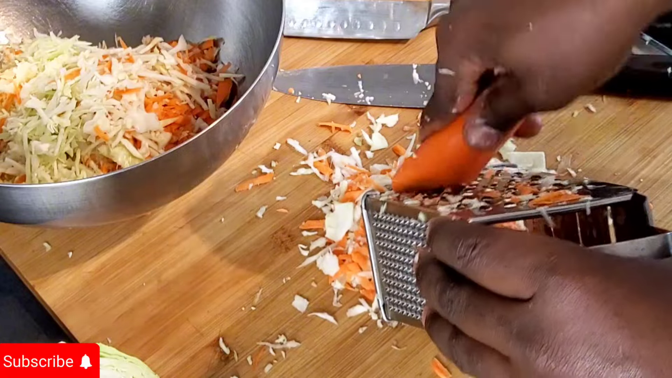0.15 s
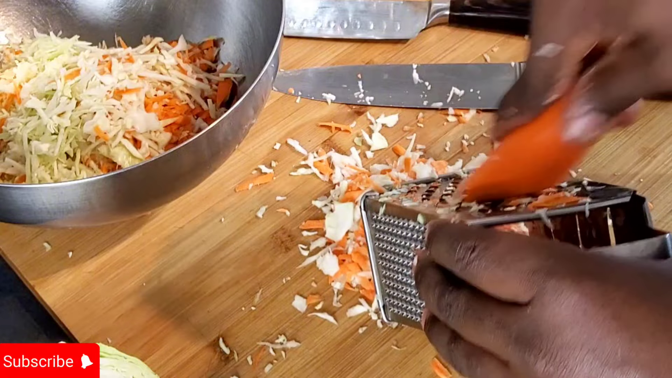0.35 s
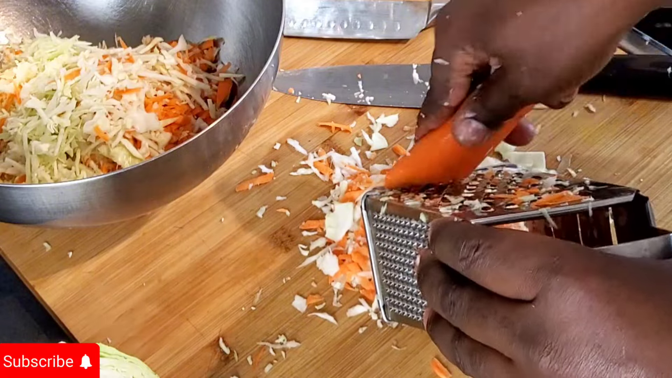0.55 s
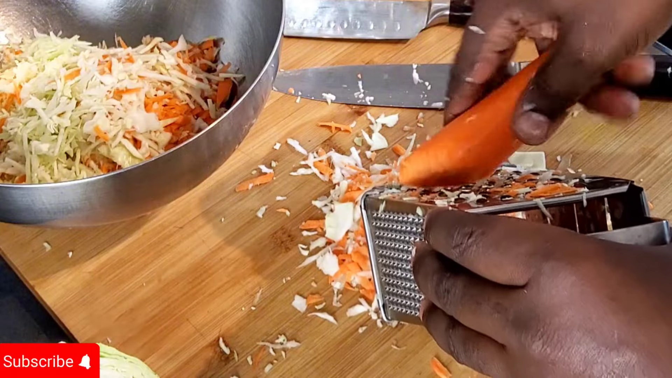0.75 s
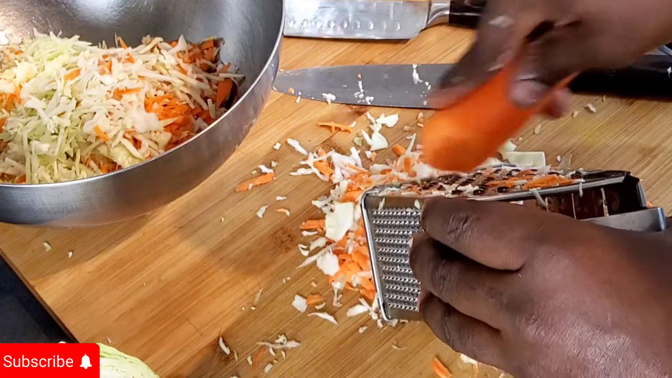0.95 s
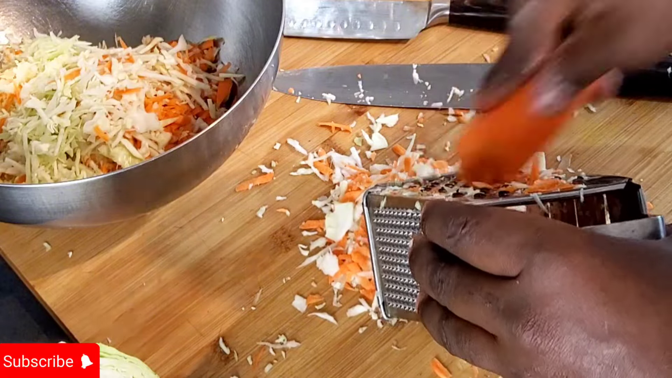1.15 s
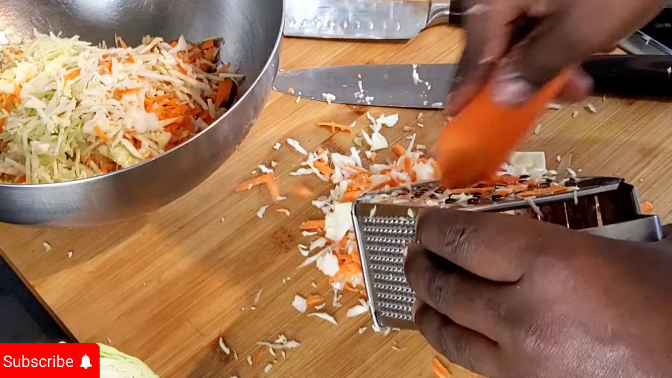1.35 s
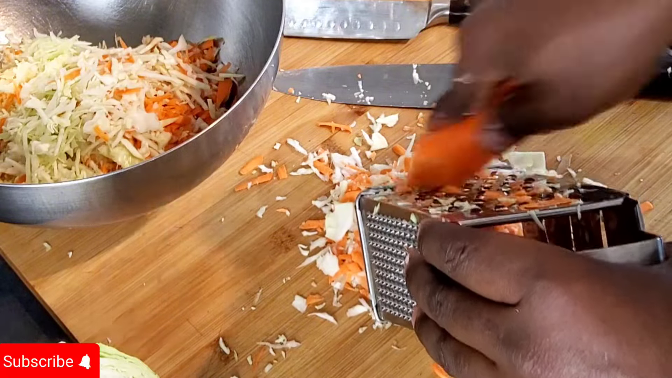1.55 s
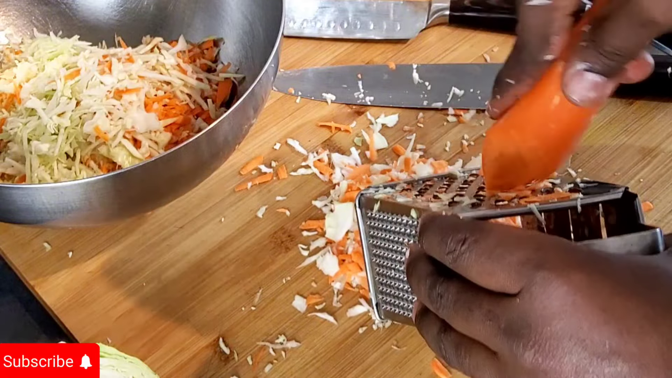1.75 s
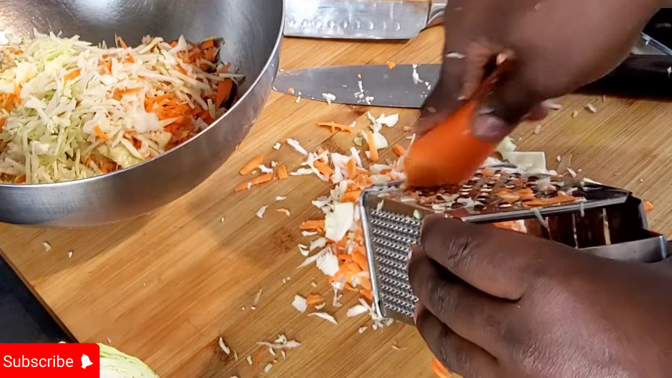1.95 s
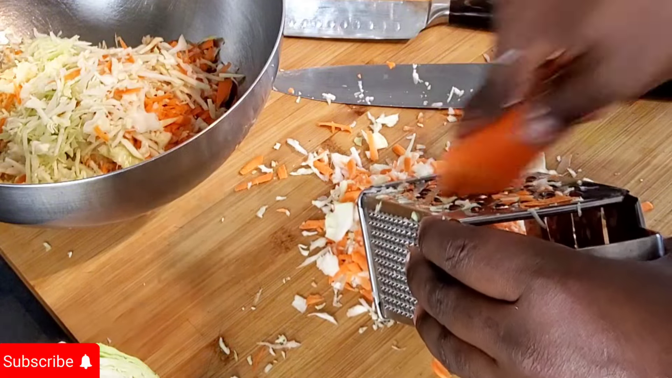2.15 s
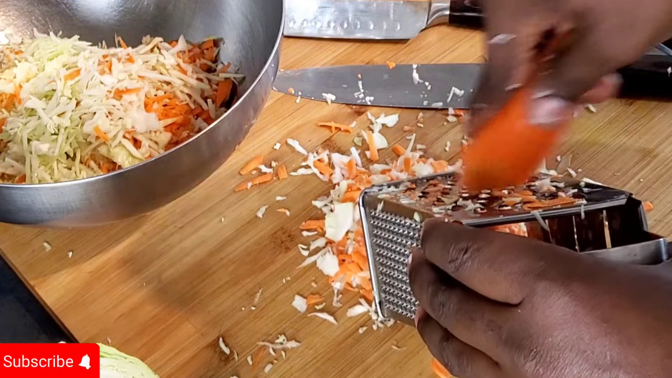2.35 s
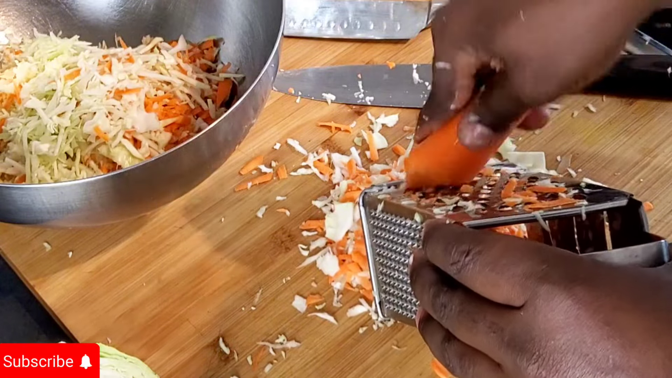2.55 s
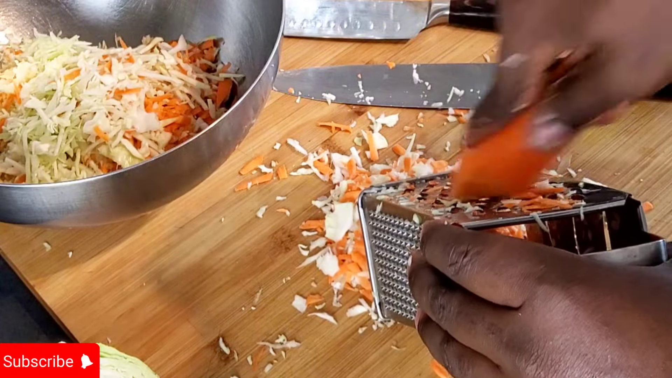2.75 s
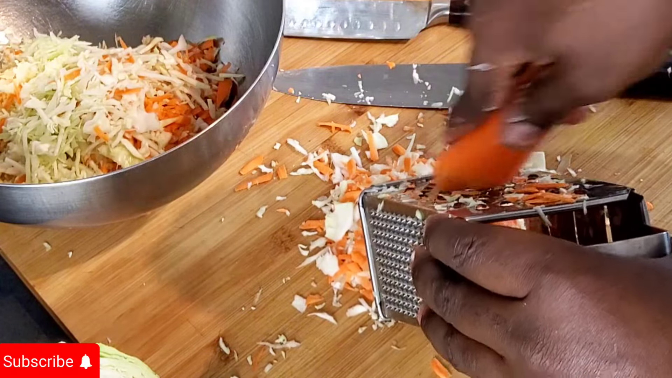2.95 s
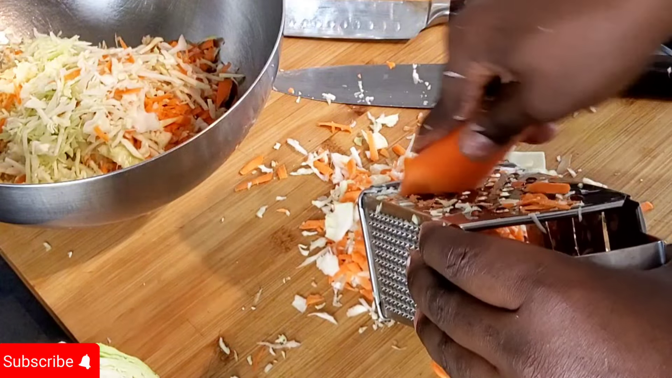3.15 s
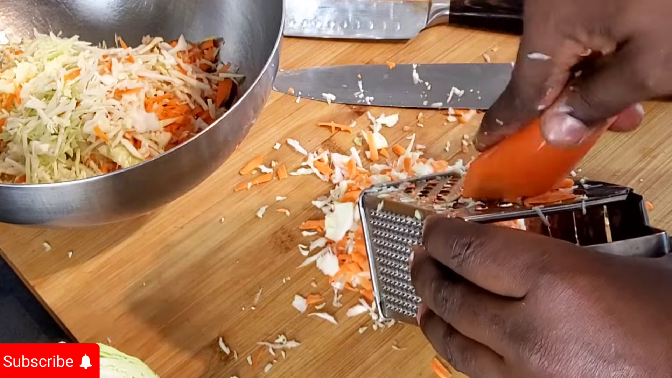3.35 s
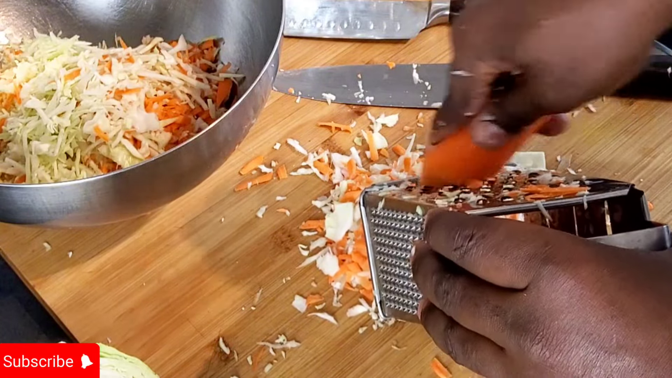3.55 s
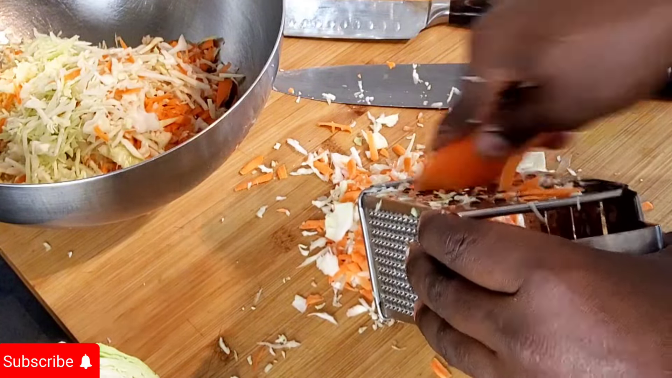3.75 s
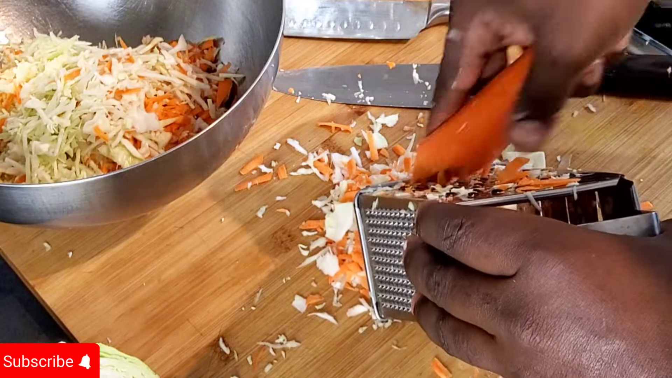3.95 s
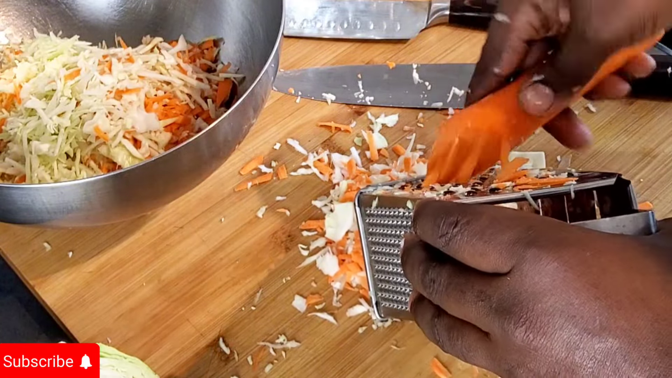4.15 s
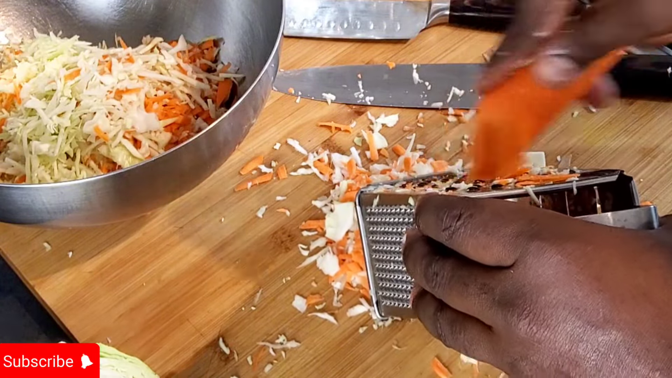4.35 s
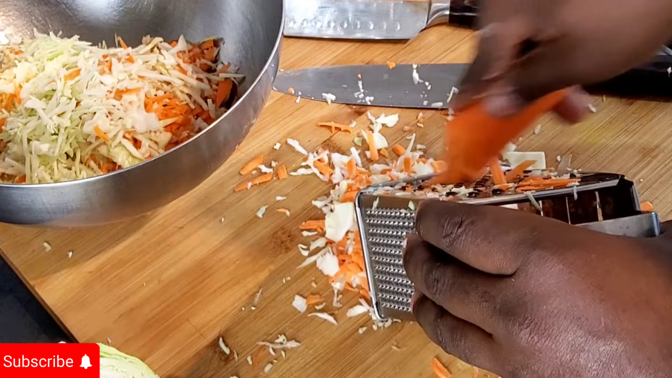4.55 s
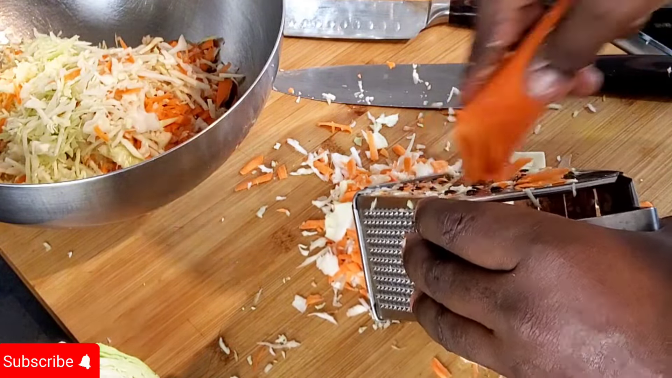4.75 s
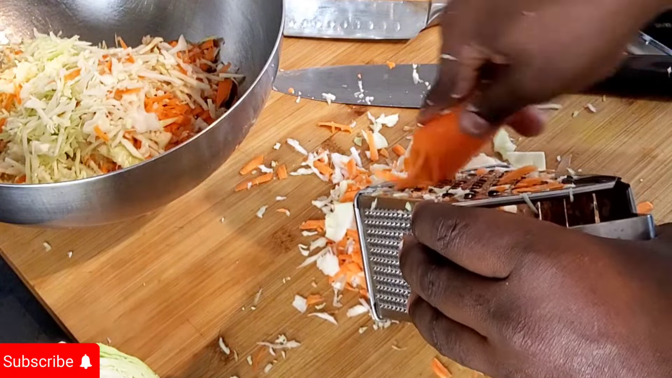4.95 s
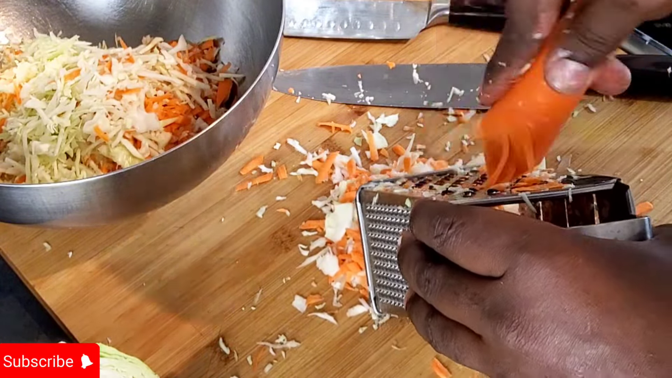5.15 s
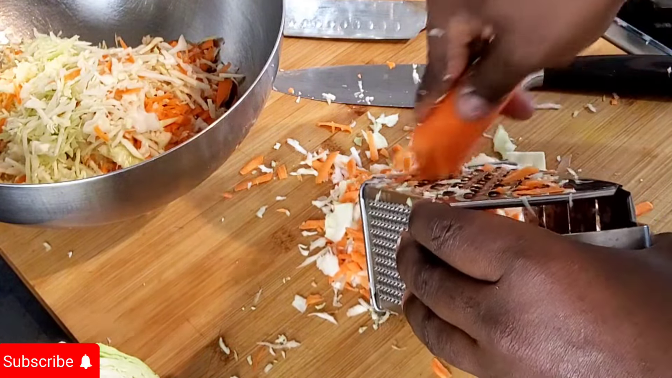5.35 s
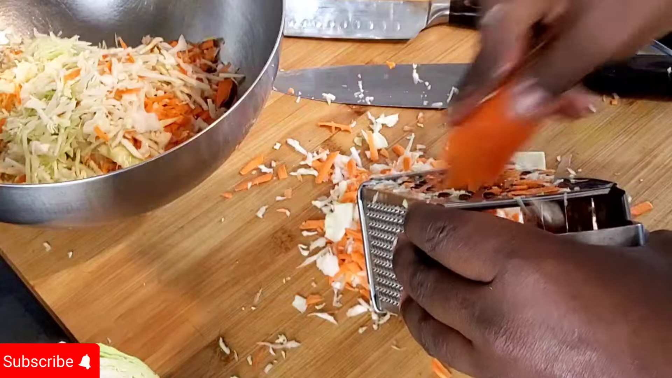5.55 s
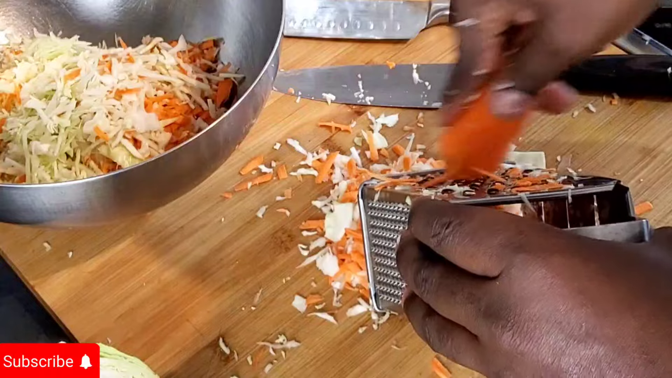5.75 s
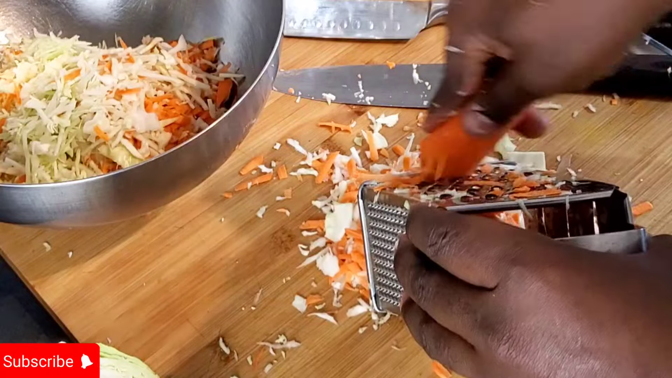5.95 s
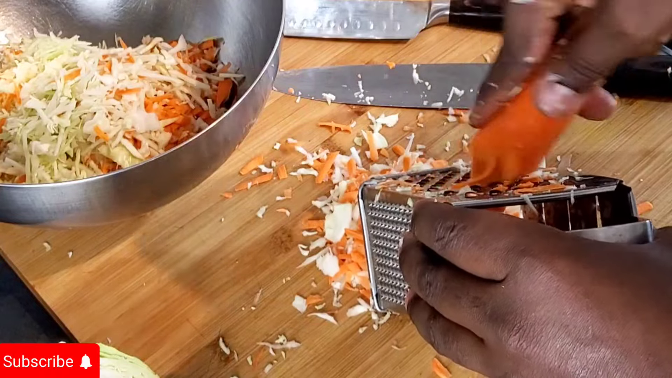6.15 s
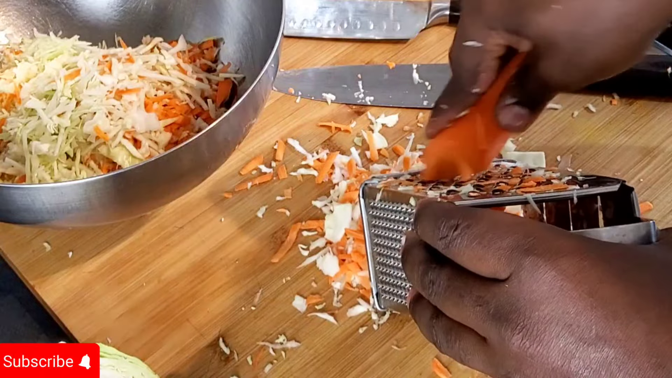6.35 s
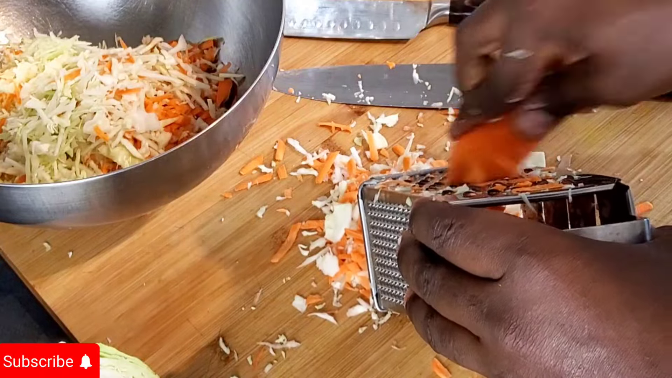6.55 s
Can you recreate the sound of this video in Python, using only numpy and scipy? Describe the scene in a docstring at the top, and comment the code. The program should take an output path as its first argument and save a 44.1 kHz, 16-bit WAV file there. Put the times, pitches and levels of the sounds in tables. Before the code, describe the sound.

A carrot is grated on a steel box grater in a quiet kitchen, close to the microphone. Each stroke is a crisp, crunchy rasp with a hollow metal ring, followed by a softer scrape back. Two strokes come first, then a short pause, a steady run at about three a second, another pause and a last run. Dull handling thumps and rumble intrude near the end, as the strokes weaken.

```python
"""A carrot on a steel box grater, held down on a wooden board in a quiet kitchen, close to the microphone.
Each forward stroke tears a dense shower of tiny crisp snaps that ring the sheet steel and boom in the box;
on the way back the carrot slides and judders over the blunt side of the teeth. Shreds flick free and
settle, and twice there is a dull handling rumble. Board, bowl and walls return short echoes."""
import sys
import numpy as np
from scipy import signal
from scipy.fft import rfft, irfft, next_fast_len
from scipy.io import wavfile
from scipy.ndimage import uniform_filter1d

SR = 44100
rng = np.random.default_rng(int(sys.argv[2]) if len(sys.argv) > 2 else 0)


def to_wav(sig):
    """Store sig (one row per channel, or 1-D mono) as 16-bit WAV at the path in sys.argv[1].

    Samples outside -1..1 are clipped; the rate is SR.
    """
    pcm = np.clip(np.atleast_2d(sig), -1, 1) * 32767
    pcm = np.round(pcm).astype(np.int16)
    wavfile.write(sys.argv[1], SR, pcm.T)  # frames by channels


N = 290619
TIME = np.arange(N) / SR


def amp(db):
    """Decibels to gain."""
    return 10 ** (np.asarray(db) / 20)


def unit(x):
    """Scales to rms 1."""
    return x / np.sqrt(np.mean(x ** 2) + 1e-20)


def add(mix, s, sound):
    """Mixes a sound in at time s."""
    part = mix[max(round(s * SR), 0):][:len(sound)]
    part += sound[:len(part)]


def through(x, taps):
    """Passes a signal through an impulse response scaled to energy 1."""
    return signal.oaconvolve(x, taps / np.linalg.norm(taps))[:N]


def wander(hz):
    """Random drift of rms 1 that changes up to about hz times a second."""
    size = next_fast_len(N, True)
    rolloff = 1 + (np.fft.rfftfreq(size, 1 / SR) / hz) ** 4
    return unit(irfft(rfft(rng.standard_normal(size)) / rolloff, size)[:N])


def snaps(per_s, spread_db, clump_db, clump_hz):
    """Tiny breaks of uneven size that come in clumps; rms 1."""
    size = amp(spread_db * np.minimum(rng.exponential(1, N), 4)) * rng.choice([-1, 1], N)
    breaks = rng.random(N) < per_s / SR
    return unit(size * breaks * amp(clump_db * wander(clump_hz)))


# resonances of the grater: f/Hz, width/Hz, lift/dB
GRATER_MODES = [(194.8, 46, 9), (266, 17, 3), (364.4, 6.3, 1), (475.3, 28, 7), (573.5, 50, -3),
                (581.4, 21, 10), (882, 25, 11), (937, 20, 8.5), (1013, 21, 10), (1220, 17, 1.5),
                (1353, 59, 2), (1410, 170, -1), (1665, 46, 10.5), (1729, 65, 11), (1930, 49, 4.5),
                (1964, 120, 4.5), (2332, 60, 1), (2820, 48, 4), (3420, 70, 0), (3430, 130, 3),
                (3980, 33, -8.5), (4140, 29, 2.5), (4840, 220, 2)]
def coloured(x, spectrum, ring=0, size=8192):
    """Filters x by a spectrum, with the grater's resonances standing out by the share ring."""
    hz = np.fft.rfftfreq(size, 1 / SR)
    corner_hz, corner_db = np.transpose(spectrum)
    db = np.interp(np.log(hz + 1), np.log(corner_hz), corner_db)
    db += ring * sum(lift / (1 + (2 * (hz - mode) / width) ** 2) for mode, width, lift in GRATER_MODES)
    cepstrum = irfft(np.log(amp(db)))
    cepstrum[1:size // 2] *= 2  # minimum phase: the ringing follows the hit
    cepstrum[size // 2 + 1:] = 0
    return through(x, irfft(np.exp(rfft(cepstrum)))[:size // 2])


# spectrum of the still kitchen: f/Hz, level/dB
AIR_SPECTRUM = [(25, -17.5), (100, -11.5), (200, 1.5), (600, -1.5), (2000, -15), (6000, -9), (13000, -8),
                (16000, -17)]
def room_tone(level_db=-83):
    """The nearly silent room around the microphone: a faint, steady noise."""
    return amp(level_db) * coloured(rng.standard_normal(N), AIR_SPECTRUM)


def reverberation(x, t60=.35, wet_db=-33, top_hz=1500):
    """The kitchen's faint, dull tail, which outlasts the first echoes."""
    t = np.arange(SR * 3 // 4) / SR
    tail = rng.standard_normal(len(t)) * amp(-60 * t / t60)
    dull = signal.sosfilt(signal.butter(2, top_hz, fs=SR, output="sos"), x)
    return amp(wet_db) * through(dull, tail)


def with_echoes(x, t60=0.24, wet_db=-13, first_s=.002, per_s=3000):
    """The direct sound, plus a short spray of echoes off the board, bowl and walls."""
    t = np.arange(SR // 3) / SR
    echoes = rng.standard_normal(len(t)) * (rng.random(len(t)) < per_s / SR)
    echoes *= amp(-60 * t / t60) * (t > first_s)
    return (x + amp(wet_db) * through(x, echoes)) / np.hypot(1, amp(wet_db))


def even_noise(spectrum, window_s=0.032):
    """Coloured noise whose strength is held even over spans longer than the window."""
    noise = coloured(rng.standard_normal(N), spectrum)
    return noise / np.sqrt(uniform_filter1d(noise ** 2, int(window_s * SR)) + 1e-9)


# spectra of the deep rumble and of the rustle above it: f/Hz, level/dB
DEEP_SPECTRUM = [(18, -31.5), (35, -14.5), (55, 7), (80, 1), (120, -2.5), (180, -18.5), (400, -52.5)]
RUSTLE_SPECTRUM = [(70, -21.5), (140, 1.5), (220, -2.5), (320, -12.5), (450, -14.5), (700, -25.5),
                   (1500, -57.5)]
# two spells of handling rumble, a list each: t/s, deep level/dB, rustle level/dB
RUMBLE_SPELLS = [
    [(0.32, -69, -44), (0.346, -35, -73), (0.526, -45, -56), (0.568, -37, -54), (0.648, -30, -46),
     (0.686, -51, -66.5), (0.724, -39.5, -57), (0.958, -65, -83.5), (0.99, -91, -100)],
    [(5.64, -47, -33), (5.68, -24, -21), (5.76, -32, -12.5), (5.796, -21.5, -23), (5.99, -28, -28),
     (6.046, -47, -56), (6.09, -25, -30.5), (6.214, -29.5, -47.5), (6.346, -62, -55), (6.452, -52.5, -81),
     (6.498, -51, -49), (6.56, -78, -75)],
]
# dull bumps: t/s, level/dB, f/Hz
BUMPS = [(0.593, -21, 96), (0.634, -19, 65), (0.729, -24, 65), (1.272, -21.5, 150), (3.146, -22, 170),
         (3.805, -22.5, 194), (4.215, -66, 171.5), (5.671, -8.5, 138), (5.711, -4, 163), (5.748, 0, 154),
         (5.774, 0, 225), (5.848, -9.5, 140), (5.872, -4.5, 98), (6.095, -13, 134), (6.152, -14.5, 110)]
def handling(rise_cycles=0.4, bump_gain_db=-1, deep_gain_db=-1.5, rustle_gain_db=-3, top_hz=900):
    """Handling noise: round, quickly damped bumps over a low rumble."""
    deep, rustle, out = even_noise(DEEP_SPECTRUM), even_noise(RUSTLE_SPECTRUM), np.zeros(N)
    for spell in RUMBLE_SPELLS:
        s, deep_db, rustle_db = np.transpose(spell)
        out += deep * amp(np.interp(TIME, s, deep_db + deep_gain_db, left=-120, right=-120))
        out += rustle * amp(np.interp(TIME, s, rustle_db + rustle_gain_db, left=-120, right=-120))
    t = np.arange(SR // 10) / SR
    for s, db, hz in BUMPS:
        age = hz * t / rise_cycles  # 1 at the height of the bump
        swell = (age * np.exp(1 - age)) ** 3
        add(out, s, amp(db + bump_gain_db) * swell * np.sin(2 * np.pi * hz * t))
    return signal.sosfilt(signal.butter(2, top_hz, fs=SR, output="sos"), out)


# spectrum of snapping carrot, heard close: f/Hz, level/dB
FLESH_SPECTRUM = [(2500, -64), (5500, -13.5), (7000, -10.5), (9200, -4.5), (11000, -2), (12500, 1),
                  (13600, 1.5), (14800, -0.5), (15800, -12)]
def flesh(force, ring=0):
    """Crisp flesh breaks with a sound that lies high in the treble."""
    return coloured(force, FLESH_SPECTRUM, ring)


# spectrum of the sheet steel: f/Hz, level/dB
STEEL_SPECTRUM = [(200, -30.5), (380, -15), (500, 1), (800, -1.5), (1200, 5), (1500, 0.5), (2200, 1.5),
                  (3400, 1.5), (4600, 0), (5500, -9.5), (7500, -8.5), (12000, -38)]
def steel(force, ring):
    """The grater's sheet answers a force with a midrange rasp."""
    return coloured(force, STEEL_SPECTRUM, ring)


# spectrum of carrot rubbing on the teeth: f/Hz, level/dB
RUB_SPECTRUM = [(40, -23.5), (120, -2), (200, -3), (280, -5), (370, -5), (520, -8), (800, -18.5),
                (1600, -49.5)]
def rubbing(force, ring):
    """Friction on the blunt side of the teeth sounds low and hollow."""
    return coloured(force, RUB_SPECTRUM, ring)


def shreds(level_db=-75, steel_db=-15, settle_db_per_s=2.9):
    """Loose wet shreds settle with a faint, fine crackle that slowly dies down."""
    ticks = snaps(per_s=220, spread_db=4.5, clump_db=3.5, clump_hz=14)
    ticks *= amp(level_db - settle_db_per_s * TIME)
    return flesh(ticks) + amp(steel_db) * steel(ticks, ring=0.86)


# a piece catches on a tooth and flicks free: t/s, level/dB
TOOTH_CATCHES = [(.111, -10.5), (.908, -61), (1.584, -9.5), (1.71, -27), (2.347, -14.5), (2.383, -35),
                 (2.4, -23), (3.066, -44), (4.21, -68), (4.44, -67), (5.157, -38), (5.483, -28),
                 (5.775, -33)]
def catches(decay_s=.0045):
    """Single shreds crack off and flick the steel."""
    force, t = np.zeros(N), np.arange(SR // 20) / SR
    for s, db in TOOTH_CATCHES:
        add(force, s, amp(db) * np.exp(-t / decay_s) * rng.standard_normal(len(t)) / np.pi)
    return steel(force, ring=0.36) + flesh(force)


# judders on the way back: middle t/s, level/dB, roughness (0 clean, 1 or more all rubbing)
STICK_SLIPS = [(.011, -28.5, 0.7), (.365, -37, 0.54), (1.116, -35, 0.23), (1.418, -27, 0.24),
               (1.477, -33.5, 0.4), (1.769, -22.5, 0.42), (2.106, -24.5, 0.6), (2.442, -26, 0.49),
               (3.044, -55, 1), (3.352, -51.5, .9), (4.805, -36.5, 1.06), (5.126, -35, 0.92),
               (5.484, -28, 0.83)]
def juddering(slip_hz=194.2, rise_per_db=0.03, jitter=.04, overtone=0.17, gain_db=-1):
    """Stick and slip near the box's lowest resonance: a short hollow note that breaks up into rubbing."""
    friction = snaps(per_s=2000, spread_db=0.8, clump_db=3.0, clump_hz=90)
    rub = unit(rubbing(friction, ring=0.93))
    drift, out = wander(55), np.zeros(N)
    for s, db, rough in STICK_SLIPS:
        half_s = 0.017 + 0.019 * rough  # rough judders last longer
        hz = slip_hz * np.exp(rise_per_db * (db + 28))  # the slips quicken under more force
        on = abs(TIME - s) < 4 * half_s
        rough = np.clip(rough, 0, 1)
        phase = 2 * np.pi * np.cumsum(hz * np.exp(jitter * (0.32 + rough) * drift[on])) / SR
        note = unit(np.sin(phase) + overtone * np.sin(2 * phase))
        swell = np.exp(-.5 * ((TIME[on] - s) / half_s) ** 2)
        out[on] += amp(db + gain_db) * swell * (np.sqrt(1 - rough ** 2) * note + rough * rub[on])
    return out


def damping(x, depth_db, width_hz, hold_s):
    """The wet carrot travels over the sheet, damping some of its many resonances and freeing others."""
    hz, t, spectra = signal.stft(x, SR, nperseg=1024, noverlap=768)
    across, along = np.fft.fftfreq(len(hz), hz[1])[:, None], np.fft.fftfreq(len(t), t[1])
    smooth = np.exp(-np.pi * ((across * width_hz) ** 2 + (along * hold_s) ** 2))
    patches = unit(np.fft.ifft2(np.fft.fft2(rng.standard_normal(spectra.shape)) * smooth).real)
    spectra *= amp(depth_db * 2 * np.tanh(patches / 2))
    return unit(signal.istft(spectra, SR, nperseg=1024, noverlap=768)[1][:N])


TURN_AHEAD_S = 0.044
def hand_motion(dip_db=7, half_s=0.0092):
    """A gain that dips for a moment as the hand turns round just before each stroke."""
    turns = np.array([s for s, *_ in CUTS]) - TURN_AHEAD_S
    nearest = turns[np.searchsorted((turns[1:] + turns[:-1]) / 2, TIME)]
    return amp(-dip_db * np.exp(-((TIME - nearest) / half_s) ** 2))


# the carrot slides back: middle t/s, steel scrape level/dB, wet hiss level/dB, singing f/Hz
BACK_STROKES = [(-.01, -40.5, -44, 4240), (.262, -43.5, -47.5, 2960), (1.117, -66, -59, 1400),
                (1.375, -47.5, -59, 1700), (1.725, -42.5, -53, 2660), (2.077, -37.5, -37.5, 1930),
                (2.387, -35.5, -30, 4440), (2.664, -48.5, -44, 1830), (3.0, -54, -51, 2760),
                (3.348, -55, -52, 4630), (3.653, -44.5, -46.5, 2300), (4.76, -45, -48.5, 3140),
                (5.11, -39.5, -39.5, 3560), (5.45, -37, -34.5, 1860), (5.79, -43, -38, 1920),
                (6.09, -50.5, -44, 2330), (6.497, -57, -57.5, 1950)]
def sliding(moving, hiss_gain_db=-2, scrape_gain_db=-4, sing_db=8, sing_width_hz=120, rub_db=-12):
    """The carrot ticks and rubs back over the teeth; each time the steel sings faintly at another pitch."""
    ticks = snaps(per_s=1800, spread_db=-0.5, clump_db=1.5, clump_hz=89.4)
    ticks = damping(ticks, depth_db=7.5, width_hz=110, hold_s=.025)
    hiss = flesh(ticks * moving)
    sheet = steel(ticks * moving ** .1, ring=1)  # barely dips at the turns
    rub = amp(rub_db) * rubbing(ticks, ring=1)
    out = np.zeros(N)
    for s, scrape_db, hiss_db, hz in BACK_STROKES:
        next_turn = min(start for start, *_ in CUTS if start > s) - TURN_AHEAD_S
        half_s = 0.44 * (next_turn - s)
        on = abs(TIME - s) < 4 * half_s
        singing = signal.lfilter(*signal.iirpeak(hz, hz / sing_width_hz, fs=SR), sheet[on])
        scrape = sheet[on] + (amp(sing_db) - 1) * singing + rub[on]
        swell = np.exp(-.5 * ((TIME[on] - s) / half_s) ** 2)
        out[on] += swell * amp(hiss_db + hiss_gain_db) * hiss[on]
        out[on] += swell * amp(scrape_db + scrape_gain_db) * scrape
    return out


# lift of the snaps against the steel rasp: t/s, level/dB
SNAP_LIFT = [(.1, 6.5), (.5, 7), (1.25, 2), (2.8, 9), (3.8, 7.5), (4.6, 4), (5.3, 5), (6.3, 8)]
def crispness(s):
    """The lift in dB at time s: after each pause the carrot cuts dully, then more crisply."""
    return np.interp(s, *np.transpose(SNAP_LIFT))


def pressure(levels_db, lag_s):
    """Force of the strokes: the teeth bite in fast, cut on, and let go as the hand slows."""
    power, gaps = np.zeros(N), np.diff([s for s, *_ in CUTS])
    before_pause = np.append(gaps > 2 * np.median(gaps), False)
    for (s, length, *_), db, lifts_off in zip(CUTS, levels_db, before_pause):
        bite_s = 0.012 * np.exp(-4.5 * length)  # the teeth take hold faster in a long cut
        fade_s = 0.053 * np.exp(-5.18 * length - 0.08 * crispness(s))  # long, crisp cuts end abruptly
        if lifts_off:
            fade_s *= .78  # the carrot leaves the steel
        on = slice(*np.searchsorted(TIME, [s - .1, s + .5]))
        t = TIME[on] - s - lag_s
        bite = np.logaddexp(0, -t / bite_s)
        release = np.logaddexp(0, (t - length) / fade_s)
        power[on] += (amp(db) * np.exp(-bite - release)) ** 2
    return np.sqrt(power)


# spectrum of the hollow box: f/Hz, level/dB
BOX_SPECTRUM = [(30, -22.5), (60, -19), (100, -12), (150, 2.5), (200, -2), (250, -6.5), (340, -13),
                (450, -15.5), (700, -15), (1500, -71.5)]
# forward strokes, about three a second: t/s, length/s, force level/dB, box boom level/dB
CUTS = [(0.102, 0.055, -18, -31), (0.442, 0.079, -20.5, -34.5), (1.217, 0.029, -19, -18.5),
        (1.57, 0.013, -15, -25), (1.891, 0.016, -13, -29.5), (2.2, 0.073, -22, -29),
        (2.513, 0.057, -19.5, -36), (2.834, 0.041, -21, -35.5), (3.147, 0.065, -23.5, -34.5),
        (3.471, 0.042, -19.5, -26.5), (3.783, 0.046, -20.5, -28.5), (4.583, 0.071, -24, -23.5),
        (4.942, 0.058, -20.5, -22.5), (5.266, .098, -24, -27), (5.61, 0.057, -19, -30),
        (5.949, 0.064, -22, -30.5), (6.27, 0.08, -27.5, -44.5), (6.6, 0.083, -29.5, -43)]
def cutting(snap_gain_db=2.5, rasp_gain_db=-1, boom_gain_db=-1):
    """Close to the microphone, flesh snaps on the teeth, shaking the steel and then the whole box."""
    starts, _, force_db, boom_db = np.transpose(CUTS)
    snap_db = force_db + crispness(starts)
    tearing = snaps(per_s=16000, spread_db=2.0, clump_db=1.0, clump_hz=260.8)
    tearing = damping(tearing, depth_db=5.0, width_hz=110, hold_s=0.013)
    tugging = snaps(per_s=5500, spread_db=3.0, clump_db=-1.0, clump_hz=180)
    tugging = damping(tugging, depth_db=4.0, width_hz=210, hold_s=0.054)
    shaking = unit(tugging + 0.48 * tearing)
    crisp = flesh(tearing * pressure(snap_db + snap_gain_db, lag_s=0), ring=0.98)
    rasp = steel(shaking * pressure(force_db + rasp_gain_db, lag_s=0.005), ring=0.87)
    boom = coloured(tugging * pressure(boom_db + boom_gain_db, lag_s=0.0069), BOX_SPECTRUM, ring=0.87)
    return crisp + rasp + boom


def scene():
    """The grater up close, handling noise and the quiet kitchen behind, the same in both channels."""
    moving = hand_motion()
    grater = cutting() * moving + sliding(moving) + catches() + shreds()
    air = room_tone()
    sound = with_echoes(grater) + reverberation(grater) + juddering() + handling() + air
    return np.array([sound, sound])


def record(dry, low_cut_hz=43, ceiling=.92, top_hz=15850):
    """The microphone sheds the deepest bass and rounds the highest peaks; then a steep band limit."""
    lean = signal.sosfilt(signal.butter(3, low_cut_hz, "highpass", fs=SR, output="sos"), dry)
    rounded = lean / (1 + (lean / ceiling) ** 6) ** (1 / 6)
    band_limit = signal.firwin(601, top_hz, window=("kaiser", 9), fs=SR)
    return signal.oaconvolve(rounded, band_limit[None], "same")


dry = scene()
out = record(dry)
to_wav(out)
```